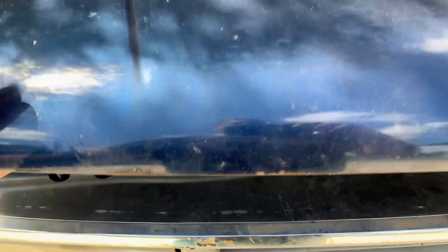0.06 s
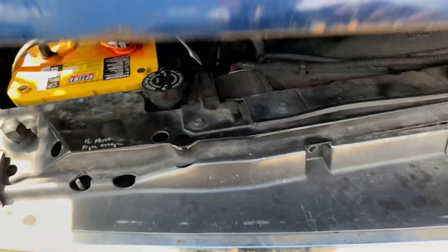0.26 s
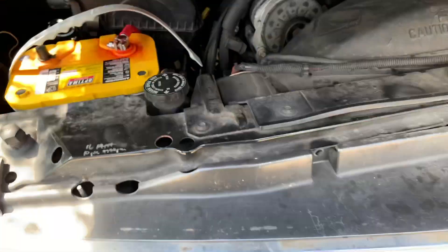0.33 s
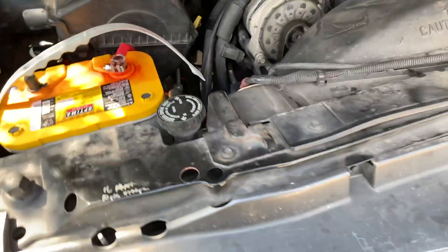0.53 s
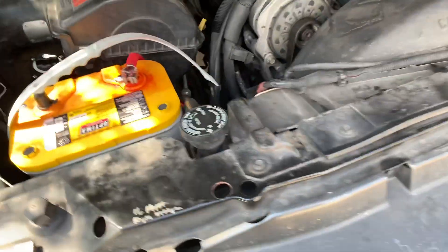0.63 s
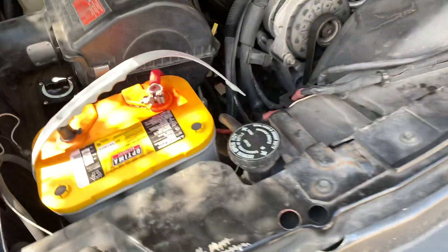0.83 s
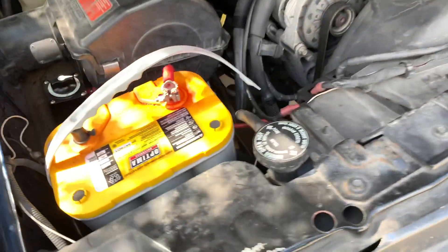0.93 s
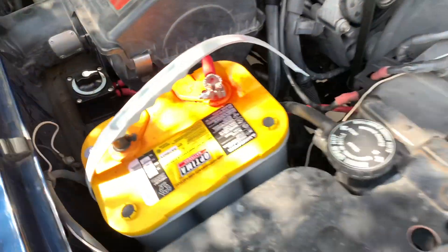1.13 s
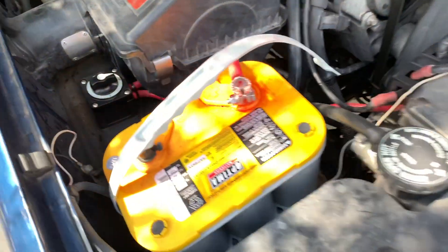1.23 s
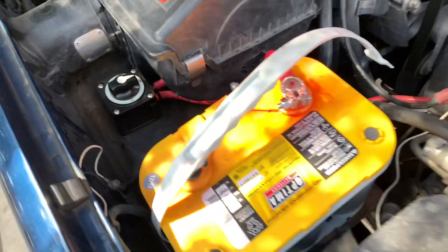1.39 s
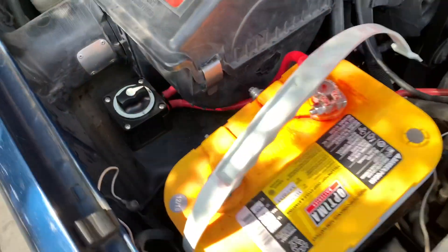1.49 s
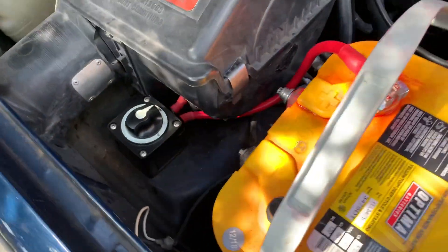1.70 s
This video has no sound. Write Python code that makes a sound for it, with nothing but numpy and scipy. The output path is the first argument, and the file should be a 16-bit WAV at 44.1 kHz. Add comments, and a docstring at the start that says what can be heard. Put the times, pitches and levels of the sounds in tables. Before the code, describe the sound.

A car hood creaks open with a low groan and ends in a thump.

```python
"""Lifting a creaky car bonnet

Outdoors, the microphone close to a steel bonnet. Its dry hinges stick and slip in three overlapping
groans, with thin squeaks and a gritty rub that rings the panel, until the bonnet thumps against its stop
and shudders. Springs scrape, the linkage ticks; handling rumble and a faint outdoor hiss lie beneath."""
import sys
import numpy as np
from scipy import signal
from scipy.fft import rfft, irfft, next_fast_len
from scipy.io import wavfile
from scipy.ndimage import map_coordinates

SR = 44100
rng = np.random.default_rng(int(sys.argv[2]) if len(sys.argv) > 2 else 0)


def to_wav(s):
    """Save 16-bit WAV."""
    ch = np.atleast_2d(s).T  # columns
    pcm = np.round(np.clip(ch, -1, 1) * 32767)  # PCM
    wavfile.write(sys.argv[1], SR, pcm.astype(np.int16))


N = 77175

# handling rumble, outdoor hiss and the top treble of that hiss: t/s, level/dB
RUMBLE = [(0, -48), (.05, -40), (.095, -29), (.135, -49), (.19, -34), (.31, -26), (.375, -21), (.42, -47),
          (.47, -41), (.51, -30), (.66, -42.5), (.8, -45.5), (.86, -30), (.92, -53), (1.01, -58),
          (1.06, -37), (1.13, -50), (1.18, -39), (1.28, -59), (1.5, -37.5), (1.62, -41.5), (1.68, -37),
          (1.75, -39.5)]
AIR = [(0, -50), (.6, -51), (1.1, -49.5), (1.52, -47.5), (1.62, -48.5), (1.75, -43.5)]
FIZZ = [(0, -97), (.6, -71), (1.1, -58.5), (1.75, -54.5)]
# their spectra: f/Hz, relative level/dB
RUMBLE_COLOUR = [(20, -41.5), (40, -9), (58, 1.5), (90, -3), (125, -11.5), (190, -21), (300, -39.5),
                 (900, -69.5)]
AIR_COLOUR = [(100, 11), (300, 7), (600, 2), (1500, -4), (3500, -3.5), (6200, -7), (7900, -7.5),
              (9100, -22), (15500, -38)]
FIZZ_COLOUR = [(5000, -8), (7800, 11), (9000, -2), (9800, 0), (11000, -7), (13000, -4.5), (15500, -7.5)]
# linkage ticks: t/s, level/dB, centre f/Hz, t60/s
TICKS = [(0.188, -44, 4550, 0.11), (.209, -35, 3870, 0.067), (.962, -49, 4000, 0.12),
         (1.515, -47, 10970, 0.055)]
# short thin squeaks, the first two being overtones as the first hinge groan starts:
# middle t/s, length/s, f/Hz, level/dB
SQUEAKS = [(0.189, 0.12, 554.5, -37.5), (0.198, 0.067, 1108, -47), (0.21, 0.093, 1953, -47.5),
           (.35, .14, 2450, -53.5), (0.5, 0.083, 1615, -39.5), (0.615, 0.23, 1633, -43),
           (0.758, 0.11, 2055, -54), (1.104, 0.076, 1744, -44.5), (1.129, 0.096, 1930, -48.5),
           (0.368, 0.11, 9680, -62.5), (.38, .11, 12000, -71), (.69, .12, 5740, -60)]
# bright scraping as the springs take up the load: t/s, level/dB
SCRAPE = [(.18, -73), (.22, -51.5), (.28, -46.5), (.325, -54), (.385, -45.5), (.45, -63.5), (.61, -78),
          (.655, -57.5), (.72, -60), (.95, -70.5)]
# its spectrum: f/Hz, relative level/dB
SCRAPE_COLOUR = [(1500, -5), (4200, 8), (7500, 0), (9000, -8.5), (9700, -5.5), (10800, -8.5), (12200, -8),
                 (15500, -11)]
# a thin metallic whine that sinks as the second groan ends: t/s, f/Hz, level/dB
WHINE = [(.42, 1370, -48), (.465, 1376, -32.5), (.56, 1379, -42), (.69, 1387, -51), (.77, 1370, -51),
         (.835, 1385, -34), (.92, 1343, -45), (1.02, 1275, -40)]
# the boom of the flexing bonnet: t/s, f/Hz, level/dB
FLEX = [(.15, 89, -41), (.19, 87.3, -32), (.26, 79.6, -33.5), (.3, 83.4, -22.5), (.335, 96, -30.5),
        (.41, 95.7, -33)]
# dry rubbing in the hinges: t/s, level/dB, gain of the bright part/dB
RUB = [(.14, -53, -19), (.157, -44.5, 8.5), (.21, -32.5, -6), (.25, -32, 2), (.37, -27, -2.5),
       (.43, -27, 1.5), (.6, -30, -2.5), (.72, -31.5, 1), (.84, -32, 6.5), (.97, -31.5, 1.5),
       (1.13, -29, 0.5), (1.19, -34, -2), (1.28, -31.5, -2.5), (1.38, -34, -5.5), (1.42, -63, 13)]
# its spectrum before the panel shapes it: f/Hz, relative level/dB
RUB_COLOUR = [(60, -33), (150, -12.5), (260, 6), (400, -4), (520, -7), (800, -8), (1200, -9.5),
              (1700, -18.5), (2600, -26.5), (5000, -39.5), (8500, -48.5), (15500, -75.5)]
# peaks and a dip in the panel's response: f/Hz, width/Hz, gain/dB
PANEL = [(218, 17, -9.5), (437, 140, 4), (709, 7.1, 9), (964, 33, 5), (1030, 20, 2.5), (1490, 68, 1),
         (1970, 31, 8.5), (3450, 460, 7.5)]
# blows on the stop, a firm hit among lighter ones: t/s, level/dB, clank relative to the low ring/dB
BLOWS = [(1.38, -32, 4), (1.387, -26.5, 0.5), (1.396, -11.5, 0.5), (1.404, -21, 7.5), (1.412, -23, -0.5),
         (1.444, -26, -12), (1.457, -29, -21)]
# low modes of the whole bonnet, bright modes of the stop and hinge arms: f/Hz, relative level/dB, t60/s
BONNET_MODES = [(105.2, -13, 0.49), (123.8, -10.5, 0.35), (190.6, -6, 0.43), (216.2, -9, 0.37),
                (330, -7, 0.075), (389, -2, 0.071), (401, -0.5, 0.097)]
CLANK_MODES = [(801, -12, .1), (1167, -32, .08), (1563, -26, 0.063), (2032, -17, 0.042), (2760, -28, 0.037),
               (4050, -35, .06)]
# spectra of a blow's crunch and of the sheet's loose shudder after it: f/Hz, relative level/dB
CRUNCH_COLOUR = [(60, -15), (170, 9), (400, 1.5), (600, -4.5), (1000, -9), (2000, -22.5), (4000, -34.5),
                 (9000, -45), (15500, -64)]
SHUDDER_COLOUR = [(70, -27), (180, -1.5), (420, -1), (540, -16.5), (830, -13.5), (1300, -31), (4000, -65)]
# the hinge groans: t/s, slip rate f/Hz, hum level/dB, rasp level/dB
FIRST_GROAN = [(.148, 288.1, -44, -32.5), (.18, 289.7, -40, -24), (.21, 288.3, -22.5, -33),
               (.26, 289.6, -20.5, -14), (.31, 281.1, -18, -15.5), (.38, 288, -13.5, -12.5),
               (.46, 288.3, -11.5, -25.5), (.55, 298.1, -14, -21.5), (.63, 303.7, -25, -27),
               (.67, 300.1, -32, -30.5), (.84, 305.4, -42, -45.5)]
SECOND_GROAN = [(.44, 391.1, -40.5, -52), (.51, 381.3, -30.5, -26.5), (.62, 365.7, -30, -28),
                (.655, 354, -22, -25.5), (.69, 341, -17, -17.5), (.73, 339.8, -16, -18.5),
                (.79, 343.2, -13.5, -12), (.858, 349, -14.5, -16), (.888, 375.2, -29, -25),
                (.908, 367.7, -19.5, -25), (.942, 370.3, -17.5, -17.5), (.97, 363, -43, -28)]
THIRD_GROAN = [(.85, 195, -53, -56), (.9, 198.4, -35, -16.5), (.97, 201.1, -31, -27),
               (1.04, 202.2, -21.5, -21.5), (1.12, 207.7, -29.5, -22.5), (1.2, 203.1, -27, -24.5),
               (1.26, 204.7, -33.5, -24.5), (1.31, 196, -30, -26), (1.37, 172, -34, -53)]
# their rasp partials: multiple of the slip rate, relative level/dB
# (half multiples come from strong and weak slips alternating)
FIRST_RASP = [(1.5, -29.5), (2, -18), (2.5, -30), (3, -25.5), (3.5, -31.5), (4, -21), (4.5, -29.5),
              (5, -38.5), (5.5, -35), (6.5, -38.5), (7, -39.5), (7.5, -45.5), (8.5, -41.5), (9.5, -41)]
SECOND_RASP = [(.5, -30.5), (1.5, -37.5), (2, -21), (2.5, -24.5), (3, -24), (3.5, -31.5), (4, -35),
               (5, -40.5), (5.5, -40), (6, -40.5)]
THIRD_RASP = [(1.5, -15), (2, -19), (3, -23.5), (4, -29.5), (5, -23.5), (6, -25), (7, -42)]


def amp(db):
    """Decibels to gain."""
    return 10 ** (np.asarray(db) / 20)


def unit(x):
    """Scaled to rms 1."""
    return x / np.sqrt(np.mean(x ** 2) + 1e-20)


def along(points, hz):
    """A spectrum's level at hz, read on a log frequency axis."""
    freqs, levels = np.transpose(points)
    return np.interp(np.log(hz + 1), np.log(freqs + 1), levels)


def curves(rows):
    """One value per sample for each column after the time."""
    times, *columns = np.transpose(rows)
    return [np.interp(np.arange(N) / SR, times, column) for column in columns]


def since(s):
    """Seconds elapsed since s, zero before."""
    return np.maximum(np.arange(N) / SR - s, 0)


def gate(rows, fade_s=0.014):
    """Fades in at the first row's time and out at the last one's."""
    return np.clip(since(rows[0][0]) / fade_s, 0, 1) * np.clip(1 - since(rows[-1][0]) / fade_s, 0, 1)


def wobble(rate):
    """A smooth random curve, rate knots a second."""
    return map_coordinates(rng.standard_normal(4096), [np.arange(N) * rate / SR], mode="wrap")


def filtered(x, response):
    """x shaped by a gain that depends on frequency."""
    size = next_fast_len(N + SR // 2)
    return irfft(rfft(x, size) * response(np.fft.rfftfreq(size, 1 / SR)), size)[:N]


def noise(colour):
    """Coloured noise of rms 1."""
    return unit(filtered(rng.standard_normal(N), lambda hz: amp(along(colour, hz))))


def ringing(x, t60):
    """x spread into a dense ring that dies in t60 seconds."""
    t = np.arange(SR // 4) / SR
    tail = rng.standard_normal(len(t)) * amp(-60 * t / t60)
    return signal.fftconvolve(x, tail / np.linalg.norm(tail))[:N]


def background():
    """Handling rumble, and open-air hiss around the car that grows brighter."""
    layers = [(RUMBLE, RUMBLE_COLOUR), (AIR, AIR_COLOUR), (FIZZ, FIZZ_COLOUR)]
    return sum(amp(curves(level)[0]) * noise(colour) for level, colour in layers)


def engine_bay(x, echo_db=-13):
    """The direct sound plus a short, dense echo between bonnet and engine."""
    return x + amp(echo_db) * ringing(x, t60=0.04)


def linkage_ticks(width_octaves=0.25, rise_s=0.006):
    """Short bright snaps in the linkage, each a dying band of noise."""
    out = np.zeros(N)
    for s, db, centre, t60 in TICKS:
        t = since(s)
        snap = filtered(rng.standard_normal(N),
                        lambda hz: np.exp(-(np.log2((hz + 1) / centre) / width_octaves) ** 2 / 2))
        out += (1 - np.exp(-t / rise_s)) * amp(db - 60 * t / t60) * unit(snap)
    return out


def squeaks(rough_rad=0.28):
    """Each squeak swells and fades on one unsteady pitch."""
    t = since(0)
    out = np.zeros(N)
    for middle, length, hz, db in SQUEAKS:
        swell = np.cos(np.pi * np.clip((t - middle) / length, -.5, .5)) ** 2
        out += np.sqrt(2) * amp(db) * swell * np.sin(2 * np.pi * hz * t + rough_rad * wobble(110))
    return out


def spring_scrape():
    """Bright friction noise as the springs take up the load."""
    return amp(curves(SCRAPE)[0]) * noise(SCRAPE_COLOUR)


def resonance(rows, rough_rad, wobble_hz, flutter_db):
    """One unsteady resonance kept ringing by the motion."""
    hz, db = curves(rows)
    phase = 2 * np.pi * np.cumsum(hz) / SR + rough_rad * wobble(wobble_hz)
    return np.sqrt(2) * gate(rows) * amp(db + flutter_db * wobble(wobble_hz)) * np.sin(phase)


def hinge_rub(slips_per_s=9000, scatter_db=2.5, bright_hz=1470, judder_db=1.2):
    """Uneven micro-slips in the dry hinges ring the panel's many modes."""
    def colour(hz):
        panel_db = sum(db / (1 + (2 * (hz - centre) / width) ** 2) for centre, width, db in PANEL)
        return amp(along(RUB_COLOUR, hz) + panel_db)

    level_db, bright_db = curves(RUB)
    slips = (rng.random(N) < slips_per_s / SR) * rng.choice([-1, 1], N)
    strength = amp(scatter_db * rng.standard_normal(N))
    grit = unit(filtered(slips * strength, colour))
    dull = filtered(grit, lambda hz: 1 / (1 + (hz / bright_hz) ** 4))
    treble = grit - dull
    bright = (treble + ringing(treble, t60=0.18)) / np.sqrt(2)  # the panel's dense upper modes
    return amp(level_db + judder_db * wobble(60)) * (dull + amp(bright_db) * bright)


def struck(modes, t, scatter_db=1, loose_rad_per_s=14):
    """Struck steel: modes that ring out and gradually lose their pitch."""
    out = np.zeros(N)
    for hz, db, t60 in modes:
        decay = amp(db + scatter_db * rng.standard_normal() - 60 * t / t60)
        out += decay * np.sin(2 * np.pi * hz * t + loose_rad_per_s * t * wobble(50))
    return out


def bonnet_thump(attack_s=0.0011, crunch_db=-5, crunch_t60=0.12, shudder_db=-13, shudder_t60=0.39):
    """The bonnet meets its stop in quick blows: each a crunching clank, a low ring and a shudder."""
    out = np.zeros(N)
    for s, db, clank_db in BLOWS:
        t = since(s)
        clank = struck(CLANK_MODES, t) + amp(crunch_db - 60 * t / crunch_t60) * noise(CRUNCH_COLOUR)
        shudder = amp(shudder_db - 60 * t / shudder_t60) * noise(SHUDDER_COLOUR)
        low_ring = struck(BONNET_MODES, t)
        out += amp(db) * (1 - np.exp(-t / attack_s)) * (low_ring + amp(clank_db) * clank + shudder)
    return out


def hinge_buzz(overtone_db=-49.5, top_hz=5800, rough_rad=0.79):
    """The sharp edges of the second groan's slips: a comb of high overtones that follows its rasp."""
    hz, _, rasp_db = curves(SECOND_GROAN)
    phase = 2 * np.pi * np.cumsum(hz) / SR
    comb = np.zeros(N)
    for k in range(7, 18):
        overtone = np.sin(k * phase + rough_rad * wobble(110) + rng.uniform(0, 2 * np.pi))
        comb += overtone * (k * hz < top_hz)
    return np.sqrt(2) * gate(SECOND_GROAN) * amp(rasp_db + overtone_db) * comb


def groan(rows, partials, rough_rad, hum_flutter_db, rasp_flutter_db=3.0):
    """One stick-slip oscillation: its nearly pure hum (complex) and its rougher rasp."""
    hz, hum_db, rasp_db = curves(rows)
    phase = 2 * np.pi * np.cumsum(hz) / SR + rough_rad * wobble(120)
    hum = amp(hum_db + hum_flutter_db * wobble(90)) * np.exp(1j * phase)
    rasp = np.zeros(N)
    for multiple, db in partials:
        gain = amp(rasp_db + db + rasp_flutter_db * wobble(29.98))
        rasp += gain * np.sin(multiple * phase + rng.uniform(0, 2 * np.pi))
    envelope = np.sqrt(2) * gate(rows)
    return envelope * hum, envelope * rasp


def hinge_groans(beat_depth=0.26):
    """Three groans overlap in turn; the first two share a hinge and modulate each other."""
    first, first_rasp = groan(FIRST_GROAN, FIRST_RASP, rough_rad=0.013, hum_flutter_db=-0.24)
    second, second_rasp = groan(SECOND_GROAN, SECOND_RASP, rough_rad=0.05, hum_flutter_db=0.1)
    third, third_rasp = groan(THIRD_GROAN, THIRD_RASP, rough_rad=0.098, hum_flutter_db=2.0)
    # the beat is deepest where the two hums are equally loud
    beat = 2 * first * np.conj(second) / (abs(first) ** 2 + abs(second) ** 2 + 1e-9)
    sidebands = beat_depth * (first * beat + second * np.conj(beat))
    hum = (first + second + third + sidebands).real
    return hum + first_rasp + second_rasp + third_rasp


def scene():
    """The whole lift from close by, in mono, over the outdoor background."""
    groans = hinge_groans()
    whine = resonance(WHINE, rough_rad=0.7, wobble_hz=71, flutter_db=2.5)
    flex = resonance(FLEX, rough_rad=0.85, wobble_hz=29.5, flutter_db=1.5)
    tones = groans + whine + flex + hinge_buzz() + squeaks()
    clatter = hinge_rub() + spring_scrape() + linkage_ticks() + bonnet_thump()
    return (tones + engine_bay(clatter) + background())[None]


def record(dry, low_cut_hz=52, top_hz=15720):
    """The microphone drops the deep bass; the recorder keeps nothing above its band limit."""
    thin = signal.sosfilt(signal.butter(2, low_cut_hz, "highpass", fs=SR, output="sos"), dry)
    return np.array([filtered(channel, lambda hz: hz < top_hz) for channel in thin])


dry = scene()
out = record(dry)
to_wav(out)
```